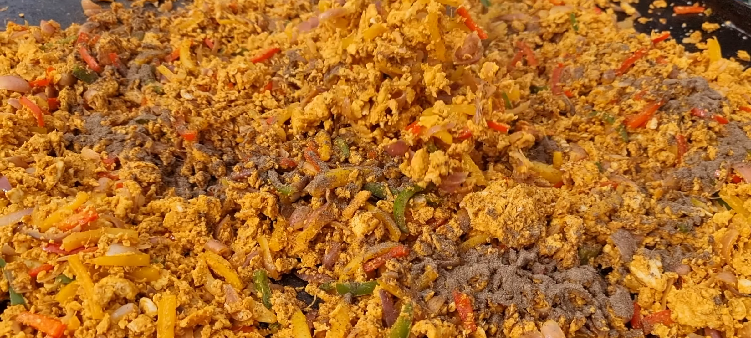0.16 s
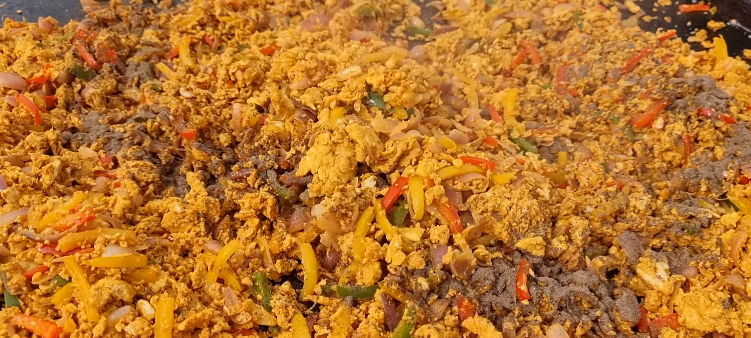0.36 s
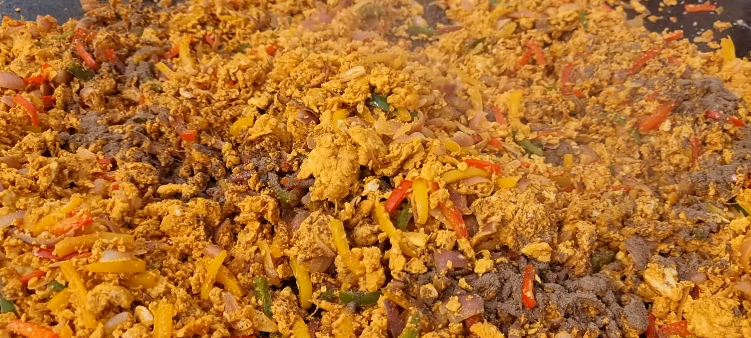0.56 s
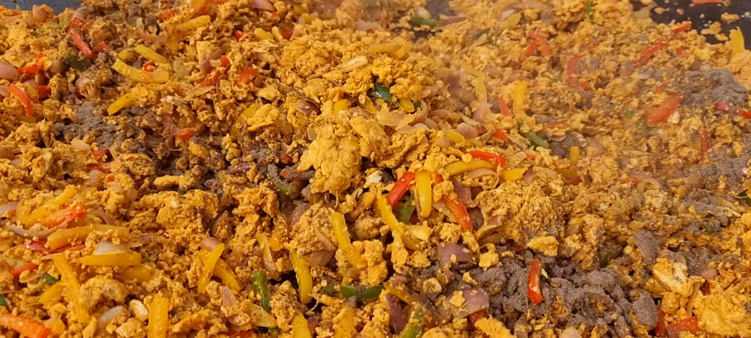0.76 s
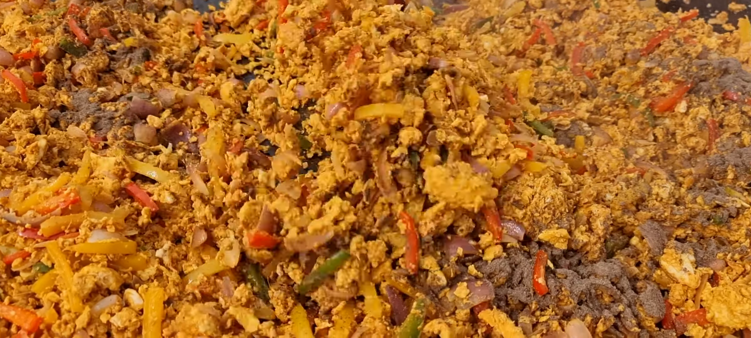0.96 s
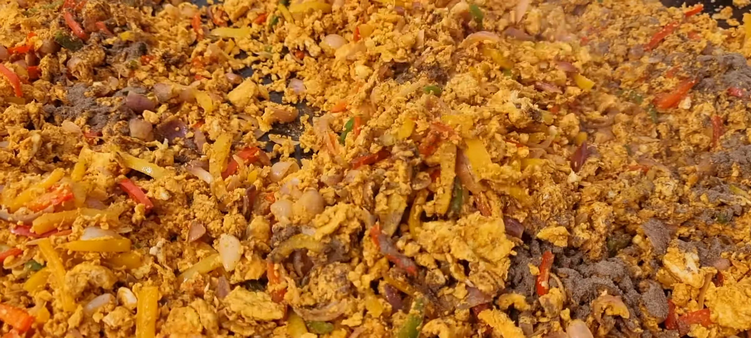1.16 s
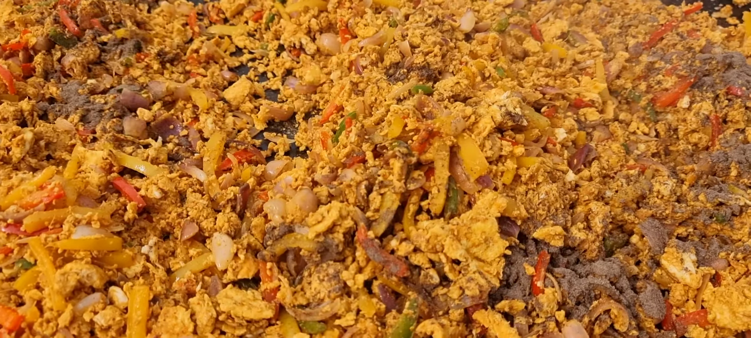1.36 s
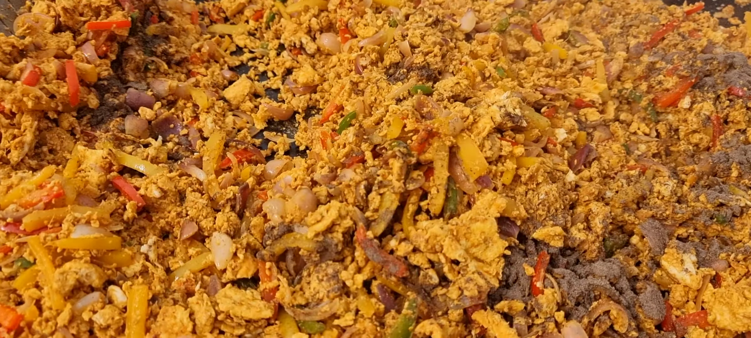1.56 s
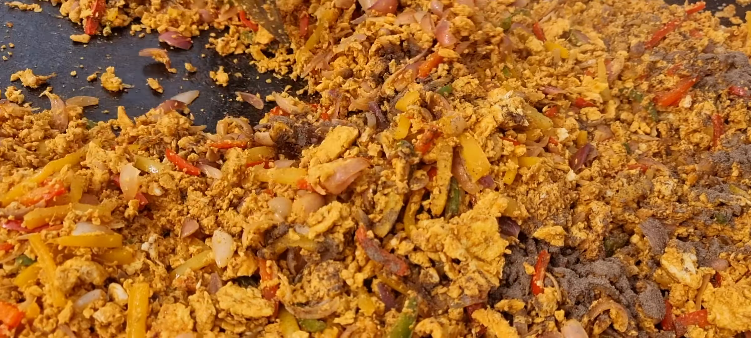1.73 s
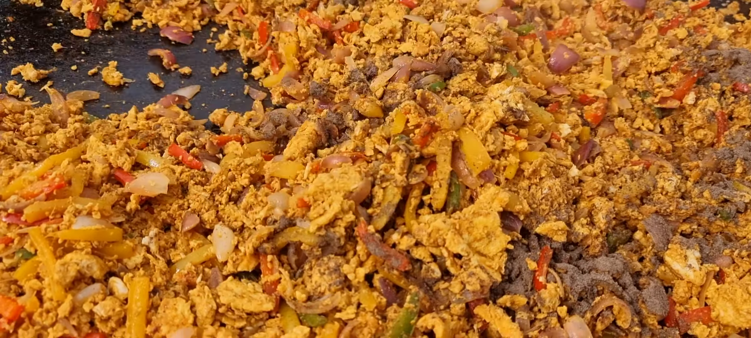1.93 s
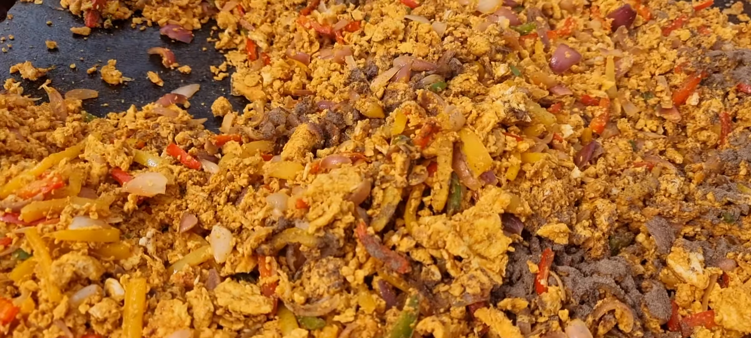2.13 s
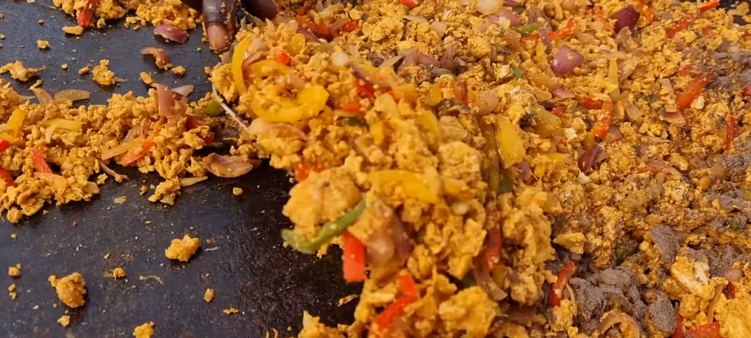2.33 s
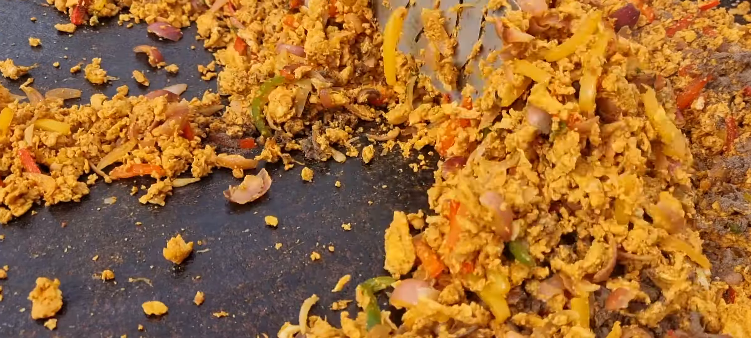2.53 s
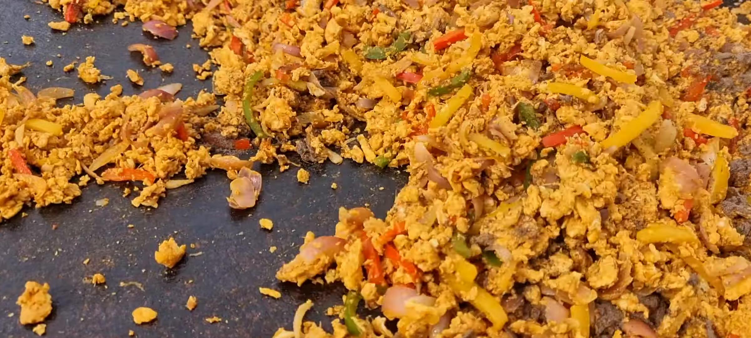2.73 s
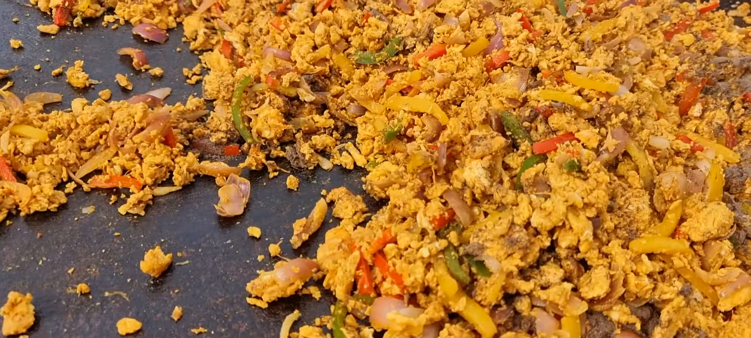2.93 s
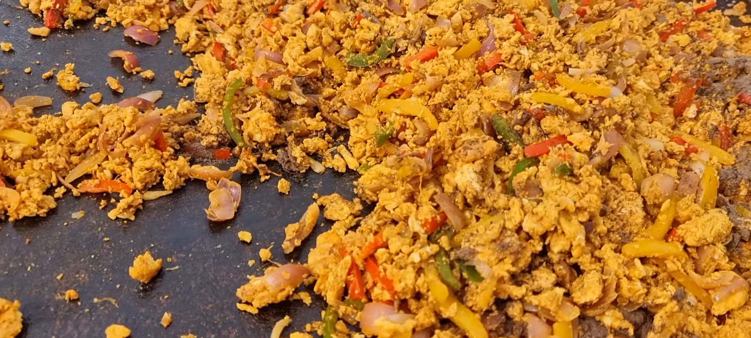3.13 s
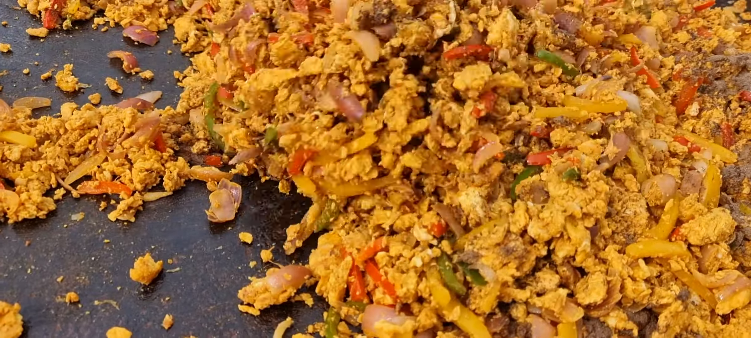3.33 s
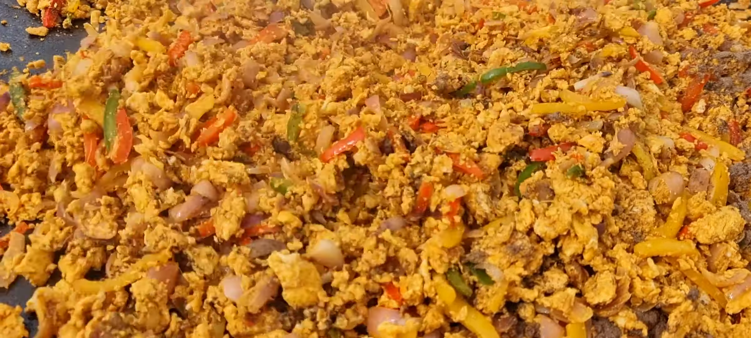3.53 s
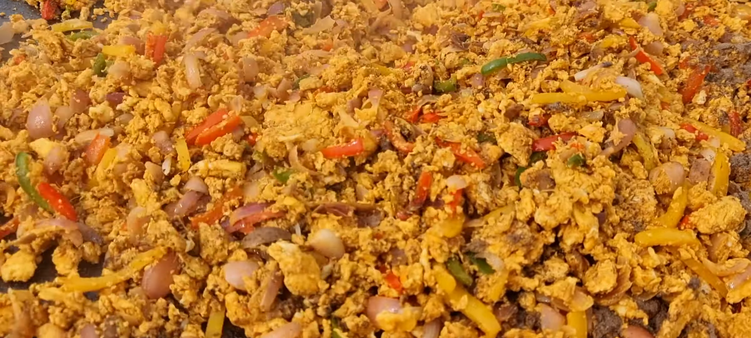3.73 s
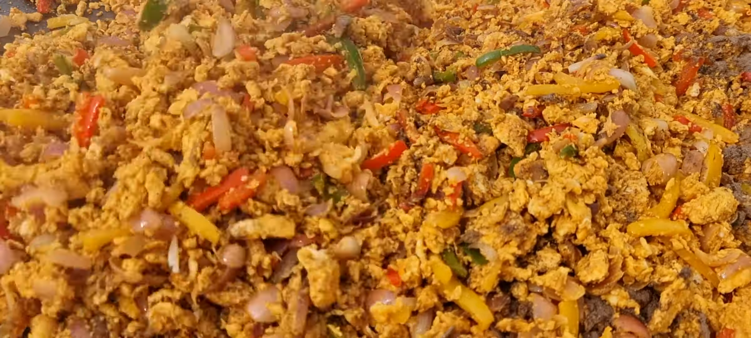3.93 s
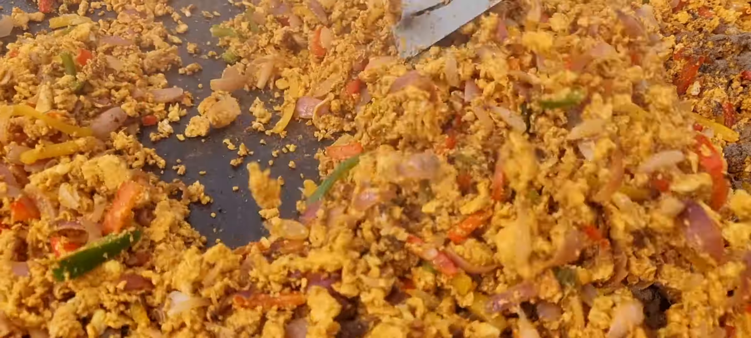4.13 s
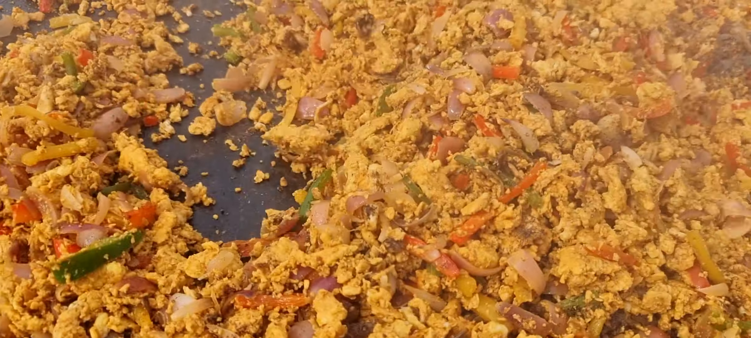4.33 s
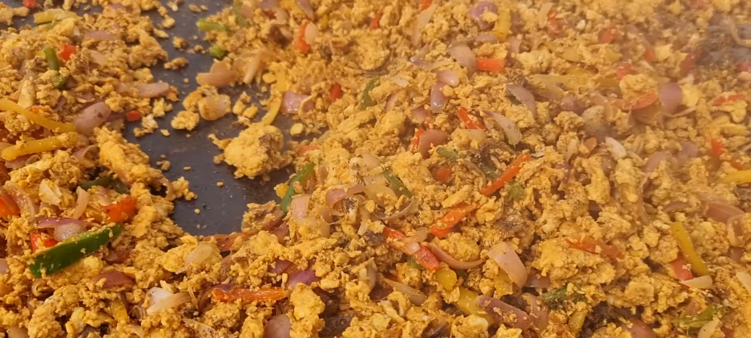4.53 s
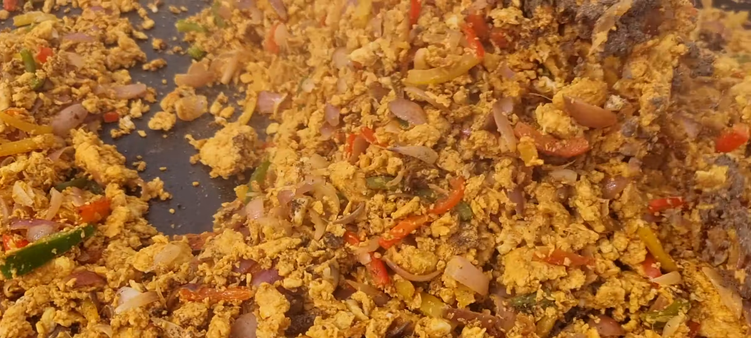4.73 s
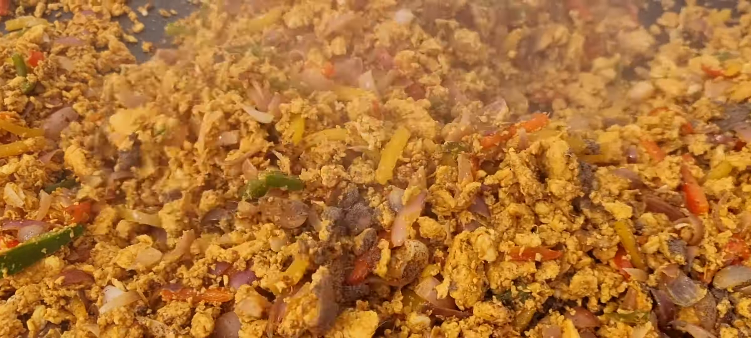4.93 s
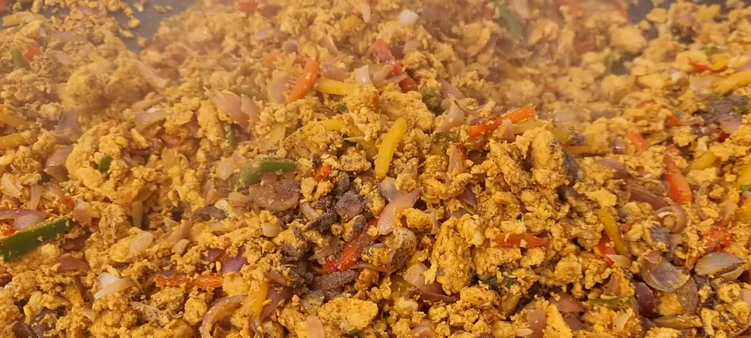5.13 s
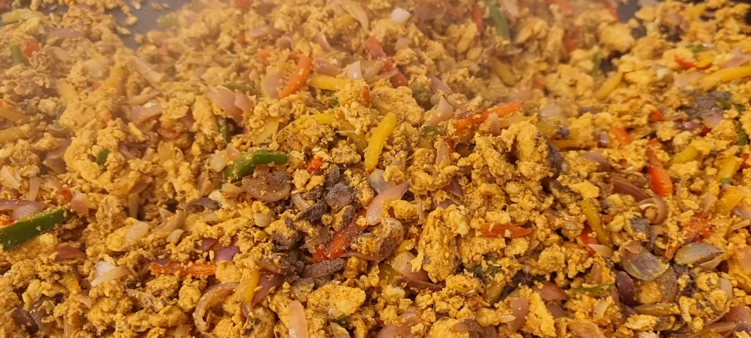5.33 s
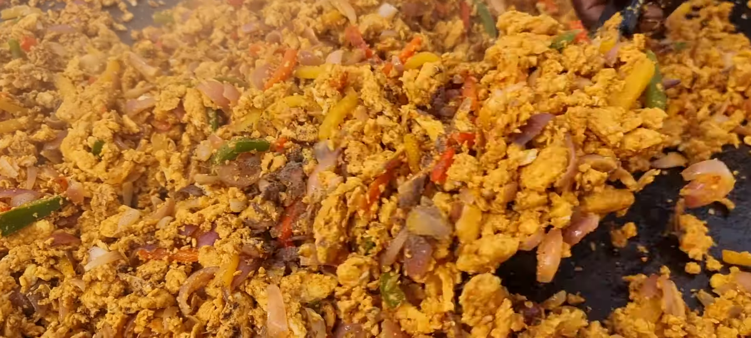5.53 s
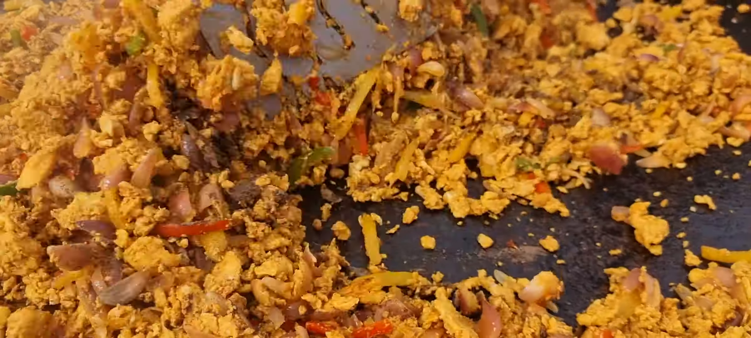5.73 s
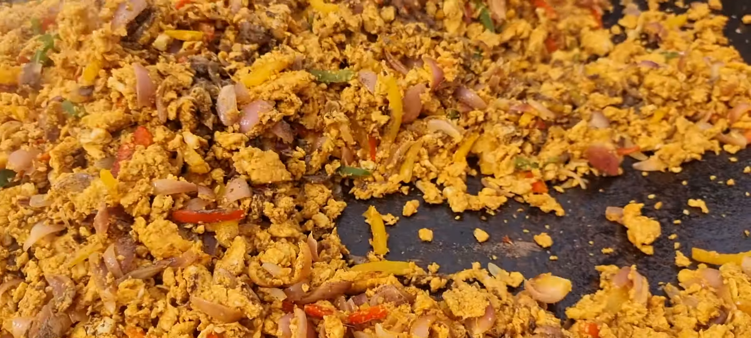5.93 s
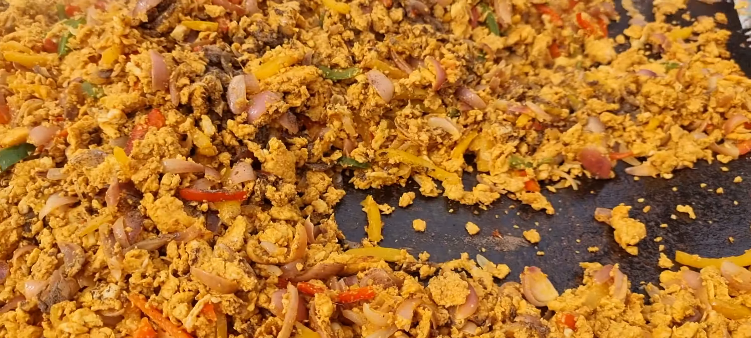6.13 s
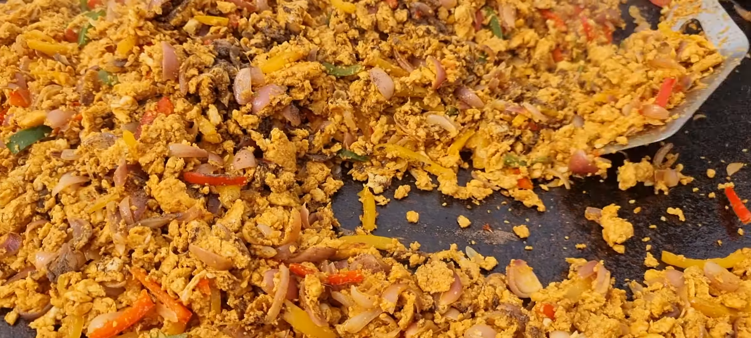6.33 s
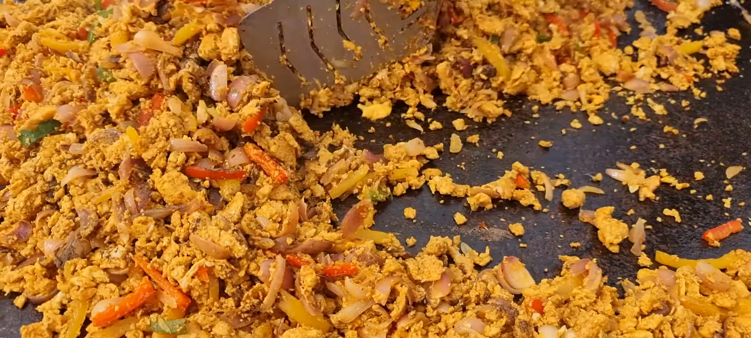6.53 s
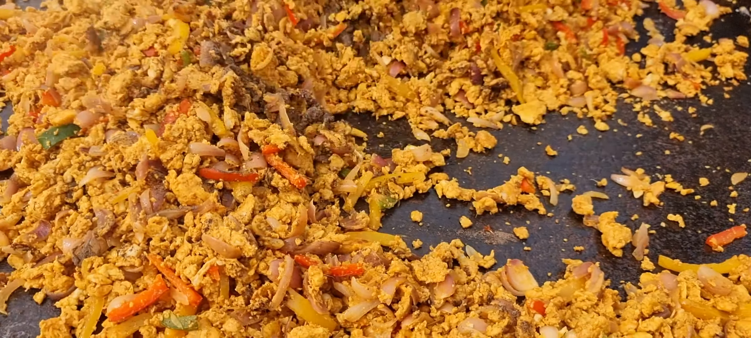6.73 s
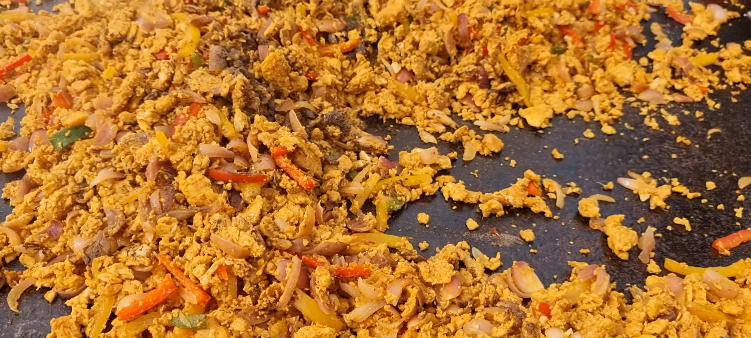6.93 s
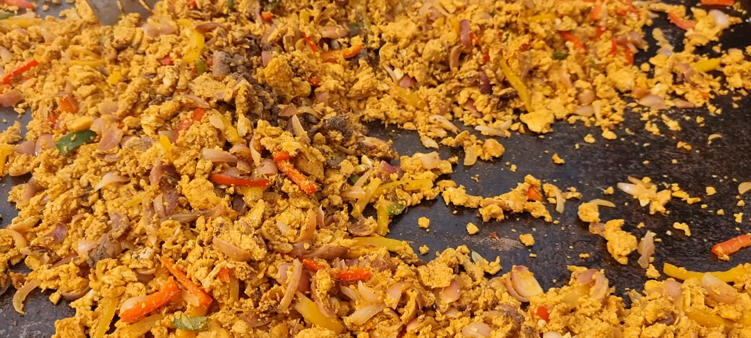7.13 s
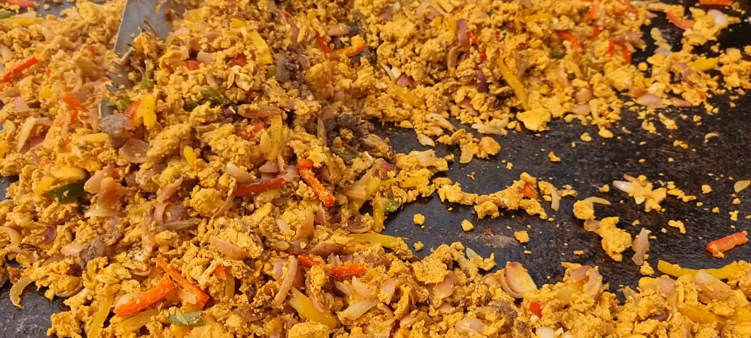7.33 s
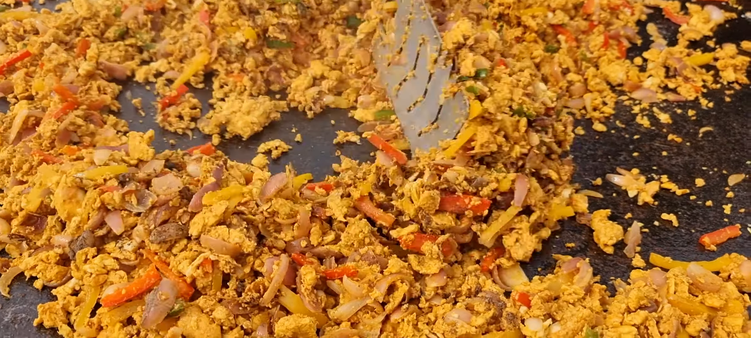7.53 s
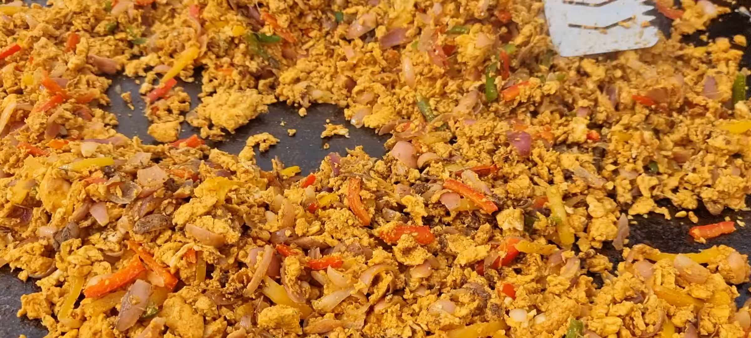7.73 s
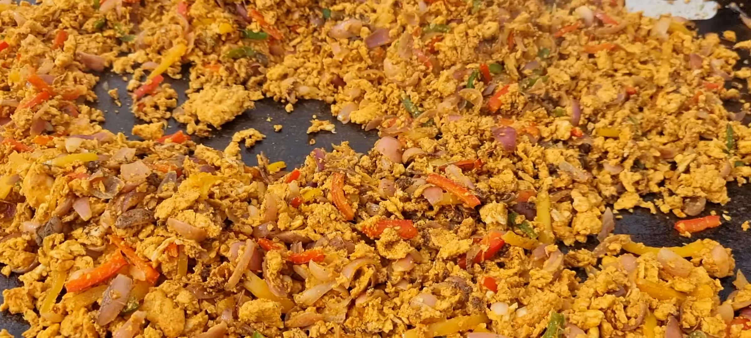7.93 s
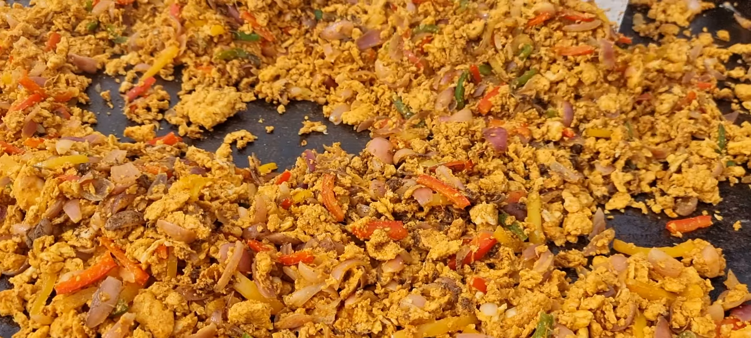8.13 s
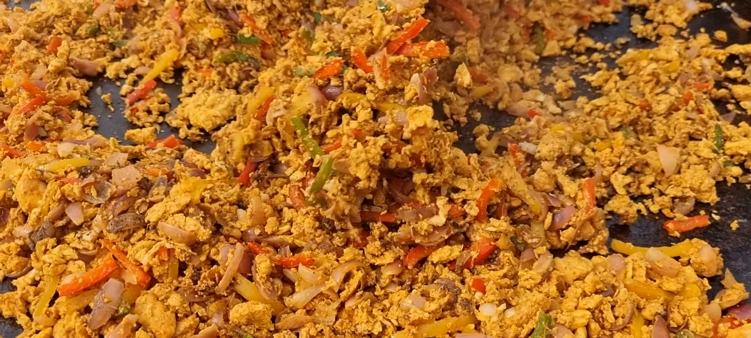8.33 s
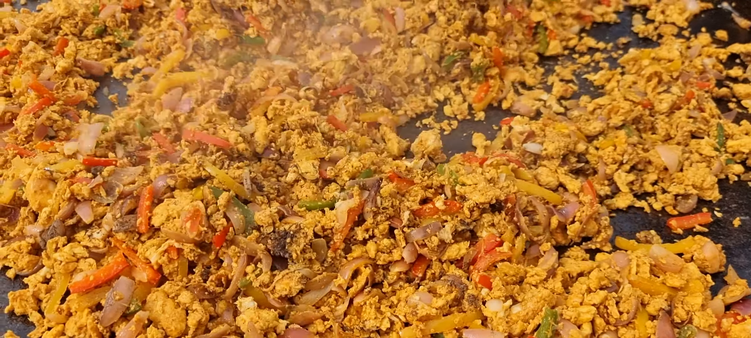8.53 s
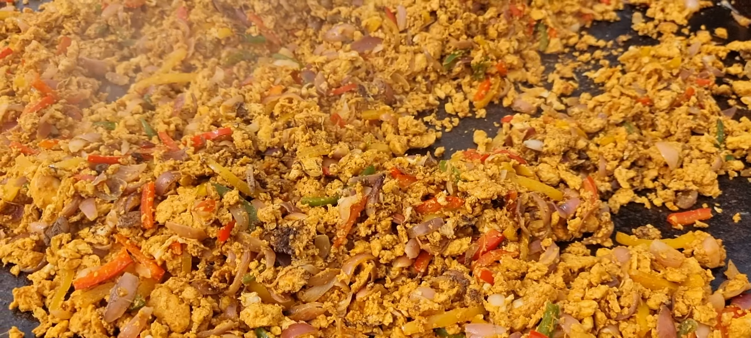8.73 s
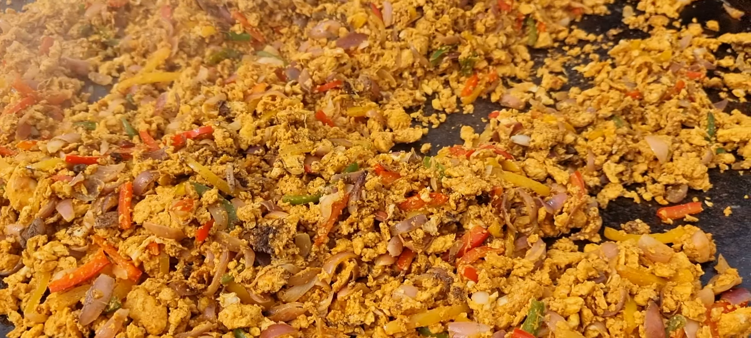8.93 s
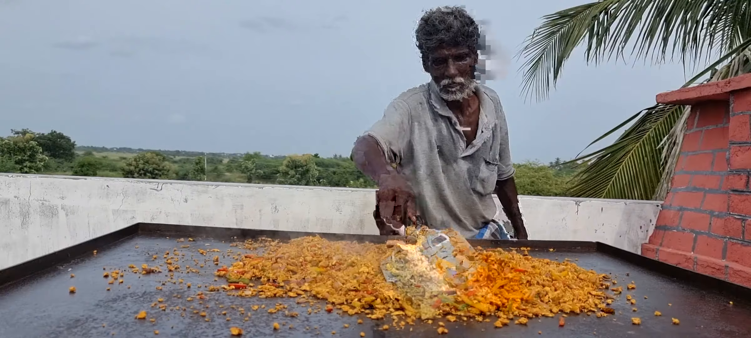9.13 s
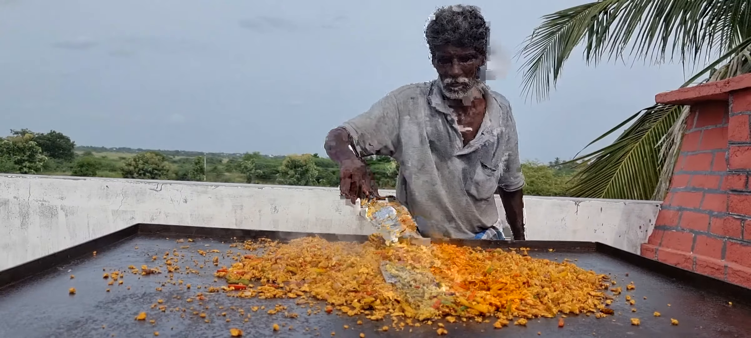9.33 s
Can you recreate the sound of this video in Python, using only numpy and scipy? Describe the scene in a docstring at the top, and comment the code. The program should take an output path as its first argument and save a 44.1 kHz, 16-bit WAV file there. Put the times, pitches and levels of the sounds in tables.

```python
"""A steel spatula grinds over a large flat griddle outdoors, then clacks down, scrapes and lifts, turning fried rice.
Countless tiny slips of its edge ring a thin blade and a heavy plate, which sings on after most strokes.
Under it, rice sizzles as coloured noise with tiny bursts, fat pops, steam whistles and a motor hums low.
Near the end the sizzle and hum drop out for an instant, the sizzle returns duller, and one short scrape is heard."""
import sys
import numpy as np
from scipy import signal
from scipy.fft import rfft, irfft, next_fast_len
from scipy.io import wavfile
from scipy.ndimage import uniform_filter1d, map_coordinates

SR = 44100
rng = np.random.default_rng(int(sys.argv[2]) if len(sys.argv) > 2 else 0)


def waveform_to_disk(signal):
    """Save audio, clipped to [-1, 1], as 16-bit WAV at the path in sys.argv[1]."""
    frames = np.transpose(np.atleast_2d(signal))
    scaled = np.clip(frames, -1, 1) * 32767
    samples = np.round(scaled).astype(np.int16)
    wavfile.write(sys.argv[1], SR, samples)


N = 413216
TIME = np.arange(N) / SR


def amp(db):
    """Decibels to gain."""
    return 10 ** (np.asarray(db) / 20)


def unit(x):
    """Scaled to rms 1."""
    return x / np.sqrt(np.mean(x ** 2) + 1e-20)


def unit_energy(x):
    """A response that passes white noise at the same level."""
    return unit(x) / np.sqrt(x.shape[-1])


def along(points, hz):
    """Reads a curve of (hz, value) points on a log frequency axis."""
    f, v = np.transpose(points)
    return np.interp(np.log(hz + 1), np.log(f + 1), v)


def wobble(rate, size):
    """A smooth random curve, rate knots a second."""
    knots = rng.standard_normal(int(size * rate / SR) + 4)
    return map_coordinates(knots, [np.arange(size) * rate / SR])


def bump(t, centre, width):
    """A bell curve of height 1."""
    return np.exp(-((t - centre) / width) ** 2)


def filtered(x, response):
    """x times a response of frequency."""
    m = next_fast_len(x.shape[-1] + 4096, True)
    spectrum = rfft(x, m) * response(np.fft.rfftfreq(m, 1 / SR))
    return irfft(spectrum, m)[..., :x.shape[-1]]


def ring(force, response):
    """A force played through a response."""
    return signal.fftconvolve(np.atleast_2d(force), np.atleast_2d(response), axes=1)


def coloured(x, spectrum):
    """x through the causal filter that has this spectrum, so attacks stay sharp."""
    size = 2048
    gain = amp(along(spectrum, np.fft.rfftfreq(size, 1 / SR)))
    # folding the cepstrum forward in time makes the filter minimum phase
    cepstrum = irfft(np.log(gain))
    cepstrum[1:size // 2] *= 2
    cepstrum[size // 2 + 1:] = 0
    return ring(x, irfft(np.exp(rfft(cepstrum))))[:, :x.shape[-1]]


def tilted(x, db_per_octave, pivot_hz=1000):
    """x made brighter or duller about a pivot; the tilt runs from 100 to 3000 Hz."""
    return filtered(x, lambda hz: amp(db_per_octave * np.log2(np.clip(hz, 100, 3000) / pivot_hz)))


def resonance(x, hz, width_hz):
    """x through one resonance applied twice for steep skirts, at rms 1."""
    return unit(filtered(x, lambda f: (1j * f * width_hz / (hz * hz - f * f + 1j * f * width_hz)) ** 2))


def paired(x, alike):
    """Two unrelated signals mixed into left and right of a given likeness."""
    def mid_side(hz):
        turn = np.arccos(np.clip(along(alike, hz), -1, 1)) / 2
        return np.array([np.cos(turn), np.sin(turn)])
    mid, side = filtered(x, mid_side)
    return np.array([mid + side, mid - side])


def burst(t60, size):
    """Countless close modes dying together: decaying noise, different left and right."""
    return rng.standard_normal((2, size)) * amp(-60 * np.arange(size) / SR / t60)


def add(track, s, sound):
    """Mix a sound into the track at time s."""
    room = track[:, max(round(s * SR), 0):][:, :sound.shape[1]]
    room += sound[:, :room.shape[1]]


# Spectrum of the open-air rumble: freq_hz, relative_level_db
RUMBLE_SPECTRUM = [(15, 1.5), (35, -5), (52, 5.5), (75, -3.5), (102, 0), (135, -14.5), (220, -20.5),
                   (500, -26), (1500, -19), (5000, -68)]
# Left-right likeness of the open air: freq_hz, likeness (-1..1, no unit)
AIR_LIKENESS = [(60, 0.3), (130, 1), (290, 0.99), (1400, 0.12), (3000, 0)]


def hum(hz=68.7, hum_db=-49.5, rumble_db=-52):
    """A distant motor drones, unsteady in pitch and level, in the low rumble of the open air."""
    phase = 2 * np.pi * np.cumsum(hz + 0.48 * wobble(7, N)) / SR
    drone = amp(hum_db) * unit(np.sin(phase) * amp(2.2 * wobble(7, N)))
    noise = rng.standard_normal((2, N))
    air = unit(paired(filtered(noise, lambda f: amp(along(RUMBLE_SPECTRUM, f))), AIR_LIKENESS))
    return drone + amp(rumble_db) * air


# Spectrum of boiling water and fat, also of dry cracks and rustles: freq_hz, relative_level_db
SIZZLE_SPECTRUM = [(150, -25), (260, -15), (450, -5), (750, -6.5), (1080, -2), (1500, -8.5), (2100, -5),
                   (3200, 0.5), (7300, -2), (8600, -5.5), (10500, -10), (13000, -4), (15500, -4)]
# The sizzle flares where fresh rice meets hot steel: time_s, level_db (before trim_db)
HEAT_COURSE = [(0, -42.5), (.5, -48), (1.1, -40), (1.35, -46), (2.6, -46), (3.55, -42.5), (4.3, -44),
               (5.95, -44.5), (7.15, -45.5), (8.93, -43.5)]


def sizzle(far, trim_db=-1.0, crackle_db=-7, rate=900):
    """Water boils out of the rice: a fine hiss with tiny bursts (rate a second) on top, duller from afar."""
    hiss = rng.standard_normal((2, N)) * amp(0.37 * wobble(6.9, N) + 1.2 * wobble(120, N))
    burst_db = 4 * np.minimum(rng.exponential(size=N), 4)
    bursts = (rng.random(N) < rate / SR) * amp(burst_db)
    crackle = ring(bursts * rng.standard_normal((2, N)), burst(0.0029, SR // 100))[:, :N]
    boiling = unit(coloured(hiss + amp(crackle_db) * unit(crackle), SIZZLE_SPECTRUM))
    near = boiling * amp(trim_db + np.interp(TIME, *np.transpose(HEAT_COURSE)))
    distant = coloured(near, [(1500, 0), (3400, -8), (7000, -11), (8600, -18), (13000, -18)])
    return (1 - far) * near + far * distant


def steam(start=4.92, end=5.05, from_hz=4150, to_hz=3720):
    """A pocket of steam escapes with a thin falling whistle: a sine of unsteady pitch and level."""
    u = np.linspace(0, 1, int((end - start) * SR))
    hz = (from_hz + (to_hz - from_hz) * u) * (1 + 0.0054 * wobble(190, len(u)))
    level = amp(-51 + 2 * wobble(50, len(u))) * np.sin(np.pi * u)
    whistle = level * np.sin(2 * np.pi * np.cumsum(hz) / SR)
    out = np.zeros((2, N))
    add(out, start, whistle[None])
    return out


# Fat spits and crumbs drop: start_s, snap_level_db, body_level_db (levels before trim)
SPITS = [(1.7729, -36, -47), (2.659, -31, -43), (2.685, -26.5, -44), (3.719, -23, -45), (5.104, -26, -61),
         (5.892, -25, -44), (6.8224, -21.5, -52), (7.0186, -29, -55), (7.964, -21, -67), (8.814, -47, -59),
         (9.215, -35, -56), (9.335, -31, -61)]


def pops(snap_trim_db=8, body_trim_db=19):
    """Single spits of fat and falling crumbs: a dry noise snap with a little body in the plate's colour."""
    out = np.zeros((2, N))
    for s, snap_db, body_db in SPITS:
        snap = unit_energy(coloured(burst(0.017, SR // 20), SIZZLE_SPECTRUM))
        add(out, s, amp(snap_db + snap_trim_db) * snap)
        body = unit_energy(coloured(burst(0.028, SR // 20), PLATE_SPECTRUM))
        add(out, s, amp(body_db + body_trim_db) * body)
    return out


# Left-right likeness of the plate: freq_hz, likeness (-1..1, no unit)
# in the middle range the plate reaches the two sides in opposite phase
PLATE_LIKENESS = [(200, 1), (330, -0.029), (520, -0.33), (1500, -0.77), (1900, -0.64), (2300, 0.51),
                  (4000, -0.39)]


def song(modes, gain_db=0, life=1):
    """Long plate modes (Hz, dB, t60 s) as dying sines, a little different each time; life scales their ring."""
    t = np.arange(int(life * SR * 2 / 3)) / SR
    hz, db, t60 = np.transpose(modes)[:, :, None]
    strength = amp(db + gain_db + 2 * rng.standard_normal(hz.shape) - 60 * t / (life * t60))
    phase = 2 * np.pi * (hz * t + rng.random(hz.shape))
    apart = np.arccos(np.clip(along(PLATE_LIKENESS, hz), -1, 1))
    return np.array([np.sum(strength * np.sin(phase + shift), 0) for shift in (0, apart)])


# Long modes of the free griddle plate: freq_hz, relative_level_db, t60_s
GRIDDLE_MODES = [(181.9, -1, 0.42), (238.7, -3.5, 0.77), (311.7, -11.5, 1), (388.7, -14.5, 1),
                 (569.5, -4, 1), (664, -6.5, 0.6), (736.4, 0, 0.53), (781.5, 3.5, 0.91), (838, -16, 1),
                 (1037, 6.5, 0.71), (1092, -12, 0.31), (1170, -5, 0.19), (1334, 3.5, 0.34),
                 (1380, -28, 0.6), (1580, 13, .15), (1618, 7, 0.46), (1740, -6.5, 0.95), (1870, 5, 0.61),
                 (2090, -12, 0.16), (2010.4, 7.5, 0.57), (2070, -4, 0.38), (2280, -30, .3),
                 (2390, 1.5, 0.41), (2453, -12.5, 0.7), (2480, -8, 0.79), (2784, 9.5, 0.28),
                 (3020, 2, 0.44), (3300, 0.5, 0.31), (3717, 10.5, 0.085)]
# Spectrum of the plate's dense clang: freq_hz, relative_level_db
PLATE_SPECTRUM = [(50, -54.5), (100, 4), (170, -16), (260, -6.5), (440, -3.5), (630, 4.5), (790, -6),
                  (900, 6), (1080, 6.5), (1350, 4), (1750, 3.5), (2200, -0.5), (3000, -8.5), (9000, -35)]


def plate(dense_t60):
    """The griddle under the spatula: a dense clang, and the long modes damped by the contact."""
    modes = unit_energy(song(GRIDDLE_MODES, life=.45))
    clang = coloured(paired(burst(dense_t60, modes.shape[1]), PLATE_LIKENESS), PLATE_SPECTRUM)
    return unit_energy(unit_energy(clang) + amp(-2) * modes)


# Modes of the spatula blade: freq_hz, width_hz, relative_level_db
SPATULA_MODES = [(2040, 170, 7.5), (2557, 36, 7), (3220, 144, -8.5), (3560, 87, -6.5), (4430, 290, -3),
                 (4940, 85, -0.5), (5427, 77, -4.5), (5785, 310, 0), (6534, 120, 0), (7360, 120, -4.5),
                 (7580, 76, -3), (8960, 190, -4)]
# Spectrum that shapes the blade's whole ring: freq_hz, relative_level_db
BLADE_SPECTRUM = [(400, -33), (1500, -38), (2400, -8.5), (2900, 8), (4000, 2.5), (6000, -2), (8000, 0),
                  (9500, -17), (11000, -13.5), (14000, -29)]


def blade(dense_db, dense_t60, grip=.01, place_db=1.5):
    """The thin blade's damped modes over a dense ring; they shift in pitch and level with the grip and bend."""
    t = np.arange(SR // 10) / SR
    hz, width, db = np.transpose(SPATULA_MODES)[:, :, None]
    hz = hz * (1 + grip * rng.standard_normal(hz.shape))
    # a mode's width sets how fast it dies
    strength = width * amp(db + place_db * rng.standard_normal(hz.shape)) * np.exp(-np.pi * width * t)
    modes = np.sum(strength * np.sin(2 * np.pi * (hz * t + rng.random((2, *hz.shape)))), 1)
    dense = amp(dense_db) * unit_energy(burst(dense_t60, len(t)))
    return unit_energy(coloured(unit_energy(modes) + dense, BLADE_SPECTRUM))


# Spectrum of the blade's tip: freq_hz, relative_level_db
EDGE_SPECTRUM = [(3000, -40), (8500, -5.5), (11000, -12.5), (12400, -8.5), (14000, -2.5), (15000, -7.5),
                 (16000, -19.5)]


def edge(t60):
    """The very short, bright ring of the blade's tip."""
    return unit_energy(coloured(burst(t60, SR // 15), EDGE_SPECTRUM))


def slips(size, spread, judder_db):
    """Friction force: countless tiny slips of uneven size, bunched by the judder of the edge."""
    sizes = np.exp(spread * rng.standard_normal(size))
    return unit(rng.standard_normal(size) * sizes * amp(judder_db * wobble(330, size)))


def blow(chatter_db, chatter_t60):
    """One sharp contact, then the edge chatters as it settles."""
    size = SR // 15
    chatter = burst(chatter_t60, size)[0] * slips(size, spread=.5, judder_db=3)
    force = amp(chatter_db) * unit_energy(chatter)
    force[0] += 1
    return unit_energy(force)


def ploughing(rustle_trim_db=-29, lead=.016, thud_db=-47, thud_t60=.35):
    """The blade cuts through rice just before it lands, a rising rustle, then shoves the heap: a dull push."""
    out = np.zeros((2, N))
    size = int(lead * SR)
    for s, db, _, _ in LANDINGS:
        rustle = unit(coloured(rng.standard_normal((2, size)), SIZZLE_SPECTRUM)) * np.linspace(0, 1, size)
        add(out, s - lead, amp(db + rustle_trim_db) * rustle)
        add(out, s, amp(thud_db) * resonance(burst(thud_t60, SR // 4)[:1], hz=107, width_hz=37))
    return out


# The edge springs off and leaves the plate singing; three loudest notes of that spot, loudest first:
# start_s, level_db, first_note_hz, second_note_hz, third_note_hz
LIFT_OFFS = [(1.67, -20.5, 572.5, 782, 1335), (2.48, -36, 1320, 1960, 845), (4.11, -39.5, 1039, 1630, 786),
             (4.80, -37.5, 1039, 2390, 1710), (5.725, -32, 1047, 2390, 786),
             (6.55, -26.5, 2007, 1039, 2040), (7.611, -29, 1333, 1039, 1650),
             (8.36, -44.5, 1106, 638, 1620), (9.025, -41.5, 1800, 1035, 1760)]
# those notes: dB lost from one to the next, t60 (s); and the gain of all other modes under them (dB)
NOTE_STEP_DB, NOTE_T60_S, OTHER_MODES_DB = 3, 0.56, -15


def lifts(swell_s=0.011, bass_hz=450, bass_db_per_octave=6):
    """Freed from the blade, the plate rings on, loudest in the notes of that spot and weak in the bass."""
    out = np.zeros((2, N))
    octaves_below = np.maximum(np.log2(bass_hz / np.array(GRIDDLE_MODES)[:, :1]), 0)
    for s, db, *notes_hz in LIFT_OFFS:
        notes = [(hz, -NOTE_STEP_DB * rank, NOTE_T60_S) for rank, hz in enumerate(notes_hz)]
        tail = song(notes) + song(GRIDDLE_MODES, OTHER_MODES_DB - bass_db_per_octave * octaves_below)
        swell = 1 - np.exp(-np.arange(tail.shape[1]) / SR / swell_s)
        add(out, s, amp(db) * tail * swell)
    return out


# The edge catches and judders in mid-stroke: start_s, level_db (before trim)
SNAGS = [(0.837, -9), (0.943, -6), (1.5705, -23), (2.4663, -6.5), (3.918, -11), (4.596, -19.5), (5.435, -2),
         (6.438, -5), (8.2736, -19), (8.282, -10)]


def catches(blade_trim_db=11, edge_trim_db=4):
    """The edge snags on a crust and judders free: a chattering blow rings blade and tip."""
    out = np.zeros((2, N))
    for s, db in SNAGS:
        force = blow(chatter_db=21, chatter_t60=0.075)
        add(out, s, amp(db + blade_trim_db) * ring(force, blade(dense_db=-1, dense_t60=.035)))
        add(out, s, amp(db + edge_trim_db) * ring(force, edge(t60=0.0084)))
    return out


# The spatula lands: start_s, blade_level_db, plate_level_db, edge_level_db (levels before trim)
LANDINGS = [(0.6044, -13.5, -27, -27.5), (1.459, -9, -13, -23), (2.019, -7.5, -12, -44),
            (3.7405, -4.5, -17, -17), (5.3062, -6.5, -23, -20), (6.2663, -6.5, -28.5, -15.5),
            (7.24, -14, -22, -47), (8.0229, -8.5, -25.5, -22)]


def clacks(plate_trim_db=31, blade_trim_db=15, edge_trim_db=25, crack_trim_db=8):
    """The spatula lands: a dry crack together with one chattering blow that rings plate, blade and tip."""
    out = np.zeros((2, N))
    for s, blade_db, plate_db, tip_db in LANDINGS:
        force = blow(chatter_db=9, chatter_t60=0.053)
        crack = unit_energy(coloured(burst(0.0055, SR // 50), SIZZLE_SPECTRUM))
        add(out, s, amp(blade_db + crack_trim_db) * crack)
        add(out, s, amp(plate_db + plate_trim_db) * ring(force, plate(dense_t60=0.14)))
        add(out, s, amp(blade_db + blade_trim_db) * ring(force, blade(dense_db=-6.0, dense_t60=0.041)))
        add(out, s, amp(tip_db + edge_trim_db) * ring(force, edge(t60=0.023)))
    return out


def bent(x, bend, sag=.04):
    """The blade flexes as it travels: its resonances wander, and sink as rice piles on."""
    size = x.shape[1]
    drift = np.cumsum(bend * wobble(11, size) + sag * np.linspace(.5, -.5, size))
    fine = signal.resample_poly(x, 4, 1, axis=1)  # finer steps for a clean varying-speed read
    return np.array([np.interp(4 * (np.arange(size) + drift), np.arange(4 * size), side) for side in fine])


def patchy(x, depth_db):
    """The contact point hops along the edge, favouring other overtones from moment to moment."""
    z = signal.stft(x, nperseg=256)[2]
    field = uniform_filter1d(rng.standard_normal(z.shape[1:]), size=3, axis=0)
    field = uniform_filter1d(field, size=9, axis=1)
    return unit(signal.istft(z * amp(depth_db * unit(field)))[1][:, :x.shape[1]])


# rice pads a light touch, a hard one reaches bare steel: plate level of each before trim (dB)
# and its tilt (dB per octave)
PADDED_DB, BARE_DB, PADDED_TILT, BARE_TILT = -40.5, -33.5, -0.81, 0.67


def padded(force, press_db):
    """The harder the edge presses, the brighter its force on the plate."""
    bare = np.clip((press_db - PADDED_DB) / (BARE_DB - PADDED_DB), 0, 1)
    return (1 - bare) * tilted(force, PADDED_TILT) + bare * tilted(force, BARE_TILT)


# widths of the stall, surge and levering bells (s); the levering peaks just before the end (s)
STALL_S, SURGE_S, LEVER_S, LEVER_BEFORE_END_S = 0.051, 0.043, 0.069, 0.038
# dB of plate rumble and of edge hiss for each dB of blade speed
PLATE_PER_SPEED, EDGE_PER_SPEED = 0.53, 1.47
# rice piles on the tip and muffles its hiss
CLOG_DB_PER_S = 22
# the weight of the landing presses on the plate at first
SETTLE_DB, SETTLE_S = 2, 0.023
# how far each sound sinks over the release (dB)
PLATE_FALL_DB, BLADE_FALL_DB, EDGE_FALL_DB = 7.5, 27, 28


def gesture(t, length, release, stall_s, stall_db, surge_s, surge_db, lever_db):
    """One push: land, stall, surge, lever up, let go. Gives the dB course of plate, blade and edge."""
    speed_db = surge_db * bump(t, surge_s, SURGE_S) - stall_db * bump(t, stall_s, STALL_S)
    levering_db = lever_db * bump(t, length - LEVER_BEFORE_END_S, LEVER_S)
    weight_db = SETTLE_DB * np.exp(-t / SETTLE_S) + levering_db
    letting_go = np.clip(1 + (t - length) / release, 0, 1)
    plate_course = PLATE_PER_SPEED * speed_db + weight_db - PLATE_FALL_DB * letting_go ** 2
    blade_course = speed_db - BLADE_FALL_DB * letting_go ** 2
    edge_course = EDGE_PER_SPEED * speed_db - CLOG_DB_PER_S * t - EDGE_FALL_DB * letting_go
    return plate_course, blade_course, edge_course


# One row a push of the spatula (levels before trim; stall and surge timed from the start):
# start_s, length_s, release_s, stall_s, stall_db, surge_s, surge_db,
# plate_level_db, lever_extra_db, blade_level_db, edge_level_db,
# hollow_db, squeal_hz, squeal_db, left_minus_right_db
PUSHES = [ (0.0,   0.21,   0.15,  .05,  7,   .029, 5,   -38.5,   -6,  -42, -76,   -3,  1890, -1.5,    0),
          (0.615, 0.43, 0.2, 0.032,  20,  0.12, 1.5,   -34,   -5,  -24.5, -24.5,   -6,  1580, -15,   0.5),
          (1.47,  0.27, 0.08, 0.011,  12,   0.11, 7, -21.5,   -1.5,  -29.5, -32.5,   -13, 1360, -27,    1.5),
          (2.029,  0.25,  0.026,  0.037, 21,  .16,  5,   -18,   -2.5,   -25.5, -31.5, -14,  1910, -5,    5.5),
          (2.263, 0.25, .11,  .0,   4.5,   0.098,  2, -22.5,   -8.5, -23.5, -26.5,  -18, 2530, -22,    3),
          (3.155, 0.27,  0.21,   .0,   6,   .07,  4,   -33.5, -9,  -32,   -39.5,   7,   2650, -14,    -3),
          (3.747,  0.4, 0.084, 0.015,  4.5,   0.065, 3.5,   -42,   7,   -29.5, -33,   2,   2950, -7.5,    2),
          (4.51,  0.34, 0.082, 0.034, 21,  0.23, 6, -36,   1,   -31,   -39.5, 3,   3410, -7,    -0.5),
          (5.318, 0.45, 0.12, 0.046, 4.5,   0.095, 5,   -37,   12.5,  -24.5,   -27.5,   -21, 2943, -8,    -1),
          (6.28, .34,  0.1,  0.027, 13,  .129, 0.5,   -35, 11,  -24, -22,   -10, 2920, -5,    -0.5),
          (7.241, 0.39, 0.081, 0.015, 6,   .22,  3, -25, 2.5,   -25.5,   -38, -16, 2630, -7.5,    1.5),
          (8.034, 0.39,  0.097,  0.032, 12.5,  0.12, 3.5, -37, -5,  -29, -37.5,   2,   2640, -19,    -3),
          (8.245, 0.092, 0.051,  .0,   8.5,  0.045, 6,   -45,   -1,  -24.5,   -30.5,   6,   3613, 2.5,     -1.5),
          (8.967, .072, 0.011,  .001, -3,   .047, -0.5,   -46,   0.5,   -37.5, -51,   4.5,   1770, -20.5,   1.5),
          ]


def scrapes(plate_trim_db=4.0, blade_trim_db=0, edge_trim_db=1, hollow_hz=1120, octave_db=-2, lift=0.0062,
            waver_db=0.75, tremor_db=1.23):
    """Each stroke drags the edge over the plate; hand pressure wavers on all of its sounds at once."""
    out = np.zeros((2, N))
    for (start, length, *motion, press_db, lever_db, rasp_db, hiss_db,
         hollow_db, squeal_hz, squeal_db, pan_db) in PUSHES:
        size = int(length * SR)
        t = np.arange(size) / SR
        contact = np.clip(t / lift, 0, 1) * np.clip((length - t) / lift, 0, 1)
        hand = contact * amp(waver_db * wobble(44.7, size) + tremor_db * wobble(138.6, size))
        plate_course, blade_course, edge_course = gesture(t, length, *motion, lever_db)
        press = hand * amp(press_db + plate_course)
        rasp = hand * amp(rasp_db + blade_course)
        hiss = hand * amp(hiss_db + edge_course)
        # the plate grinds under the pressed edge and rings past the stroke
        plate_force = padded(slips(size, spread=0.41, judder_db=3.5), press_db + plate_course)
        grind = ring(press * plate_force, plate(dense_t60=0.11))
        # another run of slips rings the blade and its tip
        force = slips(size, spread=0.74, judder_db=0.5)
        rung = ring(force, blade(dense_db=-1, dense_t60=.04))[:, :size]
        scratch = patchy(bent(rung, bend=.014), depth_db=3.3)
        shine = patchy(ring(force, edge(t60=0.0096))[:, :size], depth_db=0.5)
        # the whole blade flexes with a hollow note
        sides = np.array([force, slips(size, spread=0.6, judder_db=2.5)])
        hollow = amp(hollow_db) * resonance(paired(sides, PLATE_LIKENESS), hollow_hz, width_hz=98)
        # one overtone squeals, with its octave
        octave = amp(octave_db) * resonance(sides, 2 * squeal_hz, width_hz=123)
        overtones = resonance(sides, squeal_hz, width_hz=77) + octave
        squeal = amp(squeal_db) * bent(overtones, bend=0.018)
        steel = amp(blade_trim_db) * rasp * (scratch + squeal)
        steel = steel + amp(edge_trim_db) * hiss * shine + press * hollow
        add(out, start, amp(plate_trim_db) * grind)
        add(out, start, steel * amp([[pan_db / 2], [-pan_db / 2]]))
    return out


# Stereo balance of the whole mix: freq_hz, left_minus_right_db
STEREO_BALANCE = [(60, -2), (200, -3), (600, -.5), (1400, -1.5), (2300, -1.5), (4400, -5.5), (7800, -7.5),
                  (10300, -2.5), (13500, -7.5)]
CUT = 8.963  # s: from here the sizzle is duller and more distant


def scene():
    """The griddle lies a little to the right; sizzle and hum drop out for an instant at a cut."""
    far = np.clip((TIME - CUT) * SR, 0, 1)
    # silent for 10 ms, with 11 ms ramps on either side
    dip = np.clip((np.abs(TIME - CUT + 0.0015) - .005) / 0.011, 0, 1)
    spatula = ploughing() + clacks() + scrapes() + catches() + lifts()
    mix = spatula + pops() + steam() + dip * (sizzle(far) + hum())
    return filtered(mix, lambda hz: amp(np.array([[.5], [-.5]]) * along(STEREO_BALANCE, hz)))


TOP_HZ = 15850


def record(dry):
    """Peaks clip at full scale, then nothing above the band limit passes."""
    return filtered(np.clip(dry, -1, 1), lambda hz: hz < TOP_HZ)


dry = scene()
out = record(dry)
waveform_to_disk(out)
```